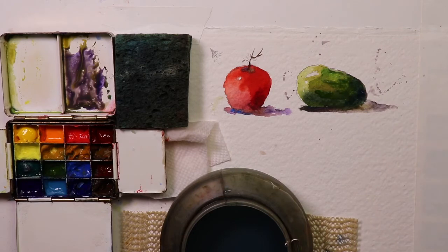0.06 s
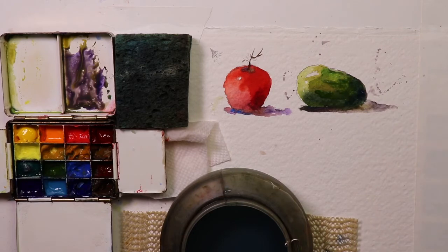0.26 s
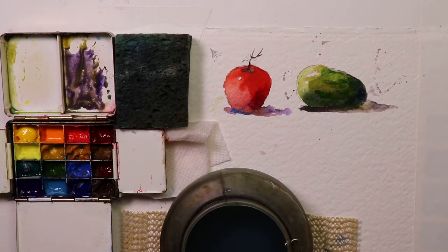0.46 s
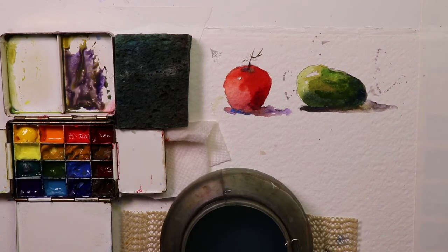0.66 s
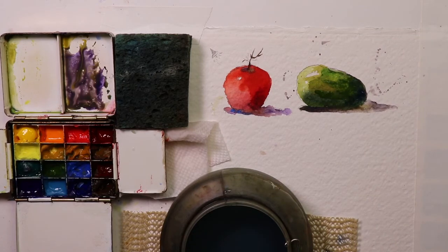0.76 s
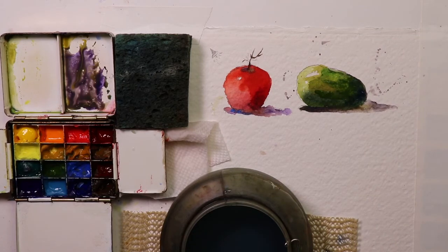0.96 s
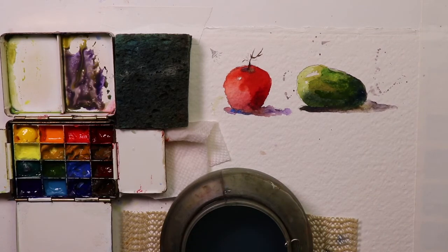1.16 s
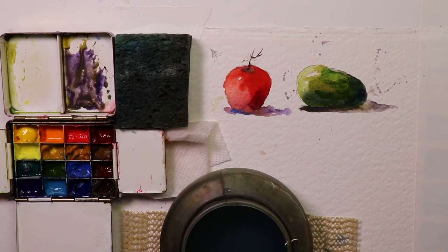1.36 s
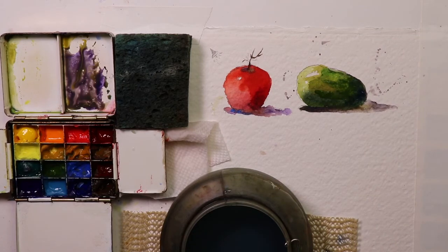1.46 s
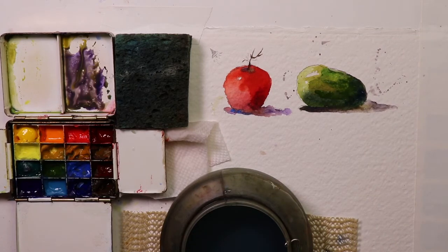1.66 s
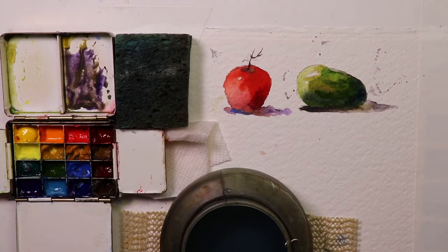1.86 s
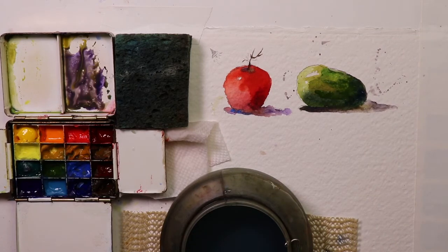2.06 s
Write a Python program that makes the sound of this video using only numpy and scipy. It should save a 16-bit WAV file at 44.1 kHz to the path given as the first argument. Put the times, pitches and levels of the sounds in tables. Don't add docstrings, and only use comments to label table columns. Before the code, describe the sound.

A wet brush rinsed in a water jar, tiny watery clicks, then one sharp tap on glass

```python
import sys
import numpy as np
from scipy import signal
from scipy.io import wavfile

SR = 44100
rng = np.random.default_rng(int(sys.argv[2]) if len(sys.argv) > 2 else 0)


def persist_wave(psi):
    counts = np.round(np.clip(psi, -1, 1) * 32767).astype(np.int16)
    wavfile.write(sys.argv[1], SR, np.atleast_2d(counts).T)


def volts_from_decibels(level):
    exponent = np.asarray(level, float) / 20
    return 10 ** exponent


N = 92345


def at_hz(points, hz):
    points = np.array(points)
    return np.interp(np.log(hz), np.log(points[:, 0]), points[:, 1])


def rms_one(x):
    return x / np.sqrt(np.mean(x ** 2) + 1e-20)


def drift(rate_hz):
    pole = np.exp(-80 * np.pi * rate_hz / SR)
    white = rng.standard_normal(N // 40 + 2002)
    slow = signal.lfilter([1], [1, -2 * pole, pole * pole], white)[2000:]
    return np.interp(np.arange(N) / 40, np.arange(len(slow)), rms_one(slow))


def since(start_s):
    longest_s = 0.3
    return np.arange(int(longest_s * SR)) / SR + np.ceil(start_s * SR) / SR - start_s


def dying(t, t60, attack_s):
    shape = (1 - np.exp(-t / attack_s)) * volts_from_decibels(-60 * t / t60)
    return shape / shape.max()


def sine(hz, t):
    return np.sin(2 * np.pi * hz * t)


def bands(white, size):
    edges = 18 * 2 ** np.arange(0, 10.1, 1 / 3)
    for k, (low, high) in enumerate(zip(edges, edges[1:])):
        sos = signal.butter(2, [low, high], "band", fs=SR, output="sos")
        yield np.sqrt(low * high), signal.sosfilt(sos, white[k % 2])[..., -size:]


def add(out, start_s, sound):
    i = max(int(np.ceil(start_s * SR)), 0)
    out[i:i + len(sound)] += sound[:N - i]


def room_tone():
    # frequency in Hz, level in dB per Hz.
    colour = [(20, -13.5), (63, -4), (260, -8.5), (400, -21), (1000, -25.5), (2500, -28), (8000, -30.5),
              (16000, -28.5)]
    # frequency in Hz, level in dB.
    side_share = [(30, -9.5), (125, -26.5), (400, -6.5), (2000, -1.5), (8000, 0.5), (11500, 1),
                  (13500, -13.5)]
    # frequency in Hz, rms level in dB.
    hums = [(58, -64), (475, -72.5), (2650, -74.5)]
    hum_widths = [2.7, 51, 540]
    out = 0
    for hz, noise in bands(rng.standard_normal((2, 2, N + SR // 2)), N):
        out = out + volts_from_decibels(at_hz(colour, hz)) * noise * [[1], [volts_from_decibels(at_hz(side_share, hz))]]
    out = volts_from_decibels(-56.5) * out / np.std(out[0])
    for (hz, db), width_hz in zip(hums, hum_widths):
        b, a = signal.iirpeak(hz, hz / width_hz, fs=SR)
        hum = signal.lfilter(b, a, signal.lfilter(b, a, rng.standard_normal(N + SR)))
        out[0] += volts_from_decibels(db) * rms_one(hum[SR:])
    return out


def desk():
    # frequency in Hz, level in dB, t60 in seconds.
    modes = [(33.8, -11.5, 1), (86.5, -1.5, 0.55), (125.8, 3, 0.25), (196.4, -18.5, 0.45)]
    knock_ago_s, knock_db = 0.00057, -34
    t = np.arange(N) / SR + knock_ago_s
    return sum(-volts_from_decibels(db + knock_db) * dying(t, t60, 0.0014) * sine(hz, t) for hz, db, t60 in modes)


def sleeve():
    # time in seconds, level in dB.
    speed = [(1.55, -69), (1.75, -63), (1.86, -59), (1.92, -55.5), (1.94, -54), (1.97, -59), (2.03, -59.5),
             (2.09, -54.5)]
    # frequency in Hz, level in dB per Hz.
    colour = [(80, -14), (250, 4), (600, -4.5), (1400, -11), (2100, -11), (3200, -14), (4500, -15),
              (9000, -24.5)]
    together, cloth = drift(17.0), 0
    for hz, noise in bands(rng.standard_normal((2, N)), N):
        if hz > 60:
            patches_db = 1.1 * together + 1.1 * drift(25.0)
            cloth = cloth + volts_from_decibels(at_hz(colour, hz) + patches_db) * noise
    times, levels_db = np.transpose(speed)
    return volts_from_decibels(np.interp(np.arange(N) / SR, times, levels_db)) * rms_one(cloth)


def tap():
    jar_modes = [472, 870, 1100, 1902, 2567, 3365, 3425, 3530, 3666, 4447, 5389, 5815, 6315, 6825]
    # level in dB, t60 in seconds.
    jar_ring = [(-19.5, 0.2), (-11.5, 0.014), (-18.5, 0.051), (-0.5, 0.08), (-16.5, 0.093), (-1, 0.081),
                (-7.5, 0.16), (-6, 0.052), (2.5, 0.047), (-17, 0.072), (-6.5, 0.064), (-10, 0.077),
                (-5.5, 0.063), (-12, .07)]
    # frequency in Hz, level in dB, t60 in seconds.
    thud_modes = [(117.8, -45.5, 0.33), (200, -41, 0.18), (334, -51.5, 0.094)]
    # frequency in Hz, level in dB per Hz.
    crack_colour = [(300, -40), (500, -10.5), (1300, -11.5), (2900, -24.5), (4100, -7.5), (6500, -4),
                    (10000, -7), (16000, -19.5)]
    # frequency in Hz, t60 in seconds.
    crack_t60 = [(400, 0.036), (3000, 0.02), (6500, 0.02), (9000, 0.013), (16000, 0.012)]
    # frequency in Hz, t60 in seconds.
    tail_t60 = [(400, .12), (3000, 0.32), (6000, 0.21), (8500, 0.038), (16000, 0.038)]
    tap_s, ring_late_s, bounce_s = 0.7492, 0.00123, 0.7566
    tap_db, crack_db, bounce_db = -19.5, -21, -7
    out, t = np.zeros(N), since(tap_s)

    ring = 0
    for hz, (db, t60) in zip(jar_modes, jar_ring):
        flutter = volts_from_decibels(1.0 * drift(78.0)[:len(t)])
        rise_s = 4.5 / hz
        ring = ring + volts_from_decibels(tap_db + db) * dying(t, t60, rise_s) * flutter * sine(hz, t)
    thud = sum(volts_from_decibels(db) * dying(t, t60, 0.0033) * sine(hz, t) for hz, db, t60 in thud_modes)

    crack = 0
    for hz, noise in bands(rng.standard_normal((2, len(t))), len(t)):
        if hz > 250:
            snap = dying(t, at_hz(crack_t60, hz), 0.0009)
            tail = volts_from_decibels(-23.5) * dying(t, at_hz(tail_t60, hz), 0.0071)
            crack = crack + volts_from_decibels(at_hz(crack_colour, hz)) * noise * (snap + tail)

    add(out, tap_s + ring_late_s, ring + thud)
    add(out, tap_s, volts_from_decibels(crack_db + 17) * crack)
    add(out, bounce_s, volts_from_decibels(crack_db + 11 + bounce_db) * crack * dying(t, 0.022, 0.0003))
    return out


def splashes():
    # start in seconds, rms level in dB, low edge in Hz, high edge in Hz, t60 in seconds.
    spits = [(.021, -46, 6100, 8660, 0.0224), (0.027, -71, 11000, 15000, 0.027),
             (.079, -48.5, 1960, 7900, 0.044), (0.093, -50, 11070, 16000, .015),
             (.121, -49.5, 9570, 14000, .02), (0.118, -54, 2000, 9000, 0.013),
             (0.221, -53.5, 1450, 8950, 0.18), (0.237, -42, 13000, 15500, 0.0258),
             (.238, -52, 2930, 11000, .03), (0.258, -49.5, 3800, 6700, 0.0554),
             (.259, -48, 1570, 3060, 0.053), (0.278, -38, 2350, 7400, 0.043),
             (.279, -49, 8000, 12900, 0.017), (0.307, -49, 2470, 7600, 0.051),
             (.335, -39, 10100, 15200, 0.03), (0.336, -50.5, 1910, 9100, 0.073),
             (.355, -37, 1434, 8400, 0.043), (.356, -52, 6400, 16000, 0.02),
             (0.395, -50, 3500, 7900, 0.029), (0.4085, -40, 1100, 8300, .025),
             (.4095, -50, 9900, 16500, 0.01), (.443, -49, 10000, 15000, 0.032),
             (1.52, -61, 1000, 4070, 0.023)]
    spray_db, droplet_db, droplet_cycles = -5, -3, 25.0
    out, t = np.zeros(N), np.arange(SR // 10) / SR
    grain = volts_from_decibels(2 * drift(190.0))
    whites = rng.standard_normal((30, SR // 10))
    draws = rng.random((30, 2, 12, 1))
    for (start_s, db, low_hz, high_hz, t60), white, (pitch, wait) in zip(spits, whites, draws):
        sos = signal.butter(4, [low_hz, high_hz], "band", fs=SR, output="sos")
        even_out = np.sqrt(SR / 2 / (high_hz - low_hz))
        spray = even_out * signal.sosfilt(sos, white * dying(t, t60, 0.00062))
        hz = low_hz * (high_hz / low_hz) ** pitch
        late_s = t60 * 0.32 * wait ** 2
        age = np.maximum(t - late_s, 0)
        fall = volts_from_decibels(-60 * late_s / t60 - 60 * age * hz / droplet_cycles)
        droplets = signal.sosfilt(sos, np.sum(fall * sine(hz, age), axis=0))
        add(out, start_s, volts_from_decibels(db) * (volts_from_decibels(spray_db) * spray + volts_from_decibels(droplet_db) * droplets))
    return out * grain


def bubbles():
    # start in seconds, peak level in dB, frequency in Hz, t60 in seconds.
    plinks = [(0.0213, -54.5, 6780, 0.02), (.080, -39.5, 3010, 0.025), (0.081, -57.5, 849, 0.06),
              (.227, -47, 1910, .015), (0.245, -42, 733.4, 0.041), (.254, -45, 844, 0.019),
              (0.2794, -23, 1624, 0.0043), (0.285, -41.5, 1431, 0.12), (0.28, -51, 1100, 0.09),
              (.283, -40.5, 1923, 0.034), (.3405, -35.5, 3335, 0.024), (.356, -47, 1934, 0.033),
              (.357, -44.5, 3654, 0.054), (.397, -52, 1868, 0.013), (0.4099, -33.5, 4050, 0.016),
              (0.4096, -38.5, 4550, 0.015), (.410, -52.5, 842, 0.053), (.441, -44, 5493, 0.015),
              (.442, -41, 3384, 0.017), (.357, -53, 860, 0.028), (0.464, -41, 3967, 0.023)]
    attack_cycles, pitch_rise = 4.7, 0.037
    out = np.zeros(N)
    for start_s, db, hz, t60 in plinks:
        t = since(start_s)
        creep = 1 + pitch_rise * np.minimum(t / t60, 1)
        add(out, start_s, volts_from_decibels(db) * dying(t, t60, attack_cycles / hz) * sine(hz, t * creep))
    return out * volts_from_decibels(2.5 * drift(180.0))


def echoes(x, level_db):
    t60 = 0.14
    lags, signs = rng.uniform(0.002, 0.08, 90), rng.choice([-1, 1], 90)
    response = np.zeros(SR // 10)
    response[(lags * SR).astype(int)] = signs * volts_from_decibels(level_db - 60 * lags / t60)
    return signal.fftconvolve(x, response)[:N]


def scene():
    mid, side = room_tone()
    cloth, rap, water = sleeve(), tap(), bubbles() + splashes()
    mid = mid + desk() + cloth + water + rap
    mid = mid + echoes(volts_from_decibels(-19) * water + volts_from_decibels(-23.5) * rap, 0)
    side = side + echoes(water + rap + cloth, -48)
    return np.array([mid + side, mid - side])


def top_cut(x):
    return signal.sosfilt(signal.butter(12, 17090, fs=SR, output="sos"), x)


def record(dry):
    shelf = signal.ellip(8, 0.3, 14, 15850, fs=SR, output="sos")
    cut = signal.ellip(10, 0.3, 60, 16900, fs=SR, output="sos")
    return top_cut(signal.sosfilt(np.vstack([shelf, cut]), dry))


dry = scene()
out = record(dry)
persist_wave(out)
```